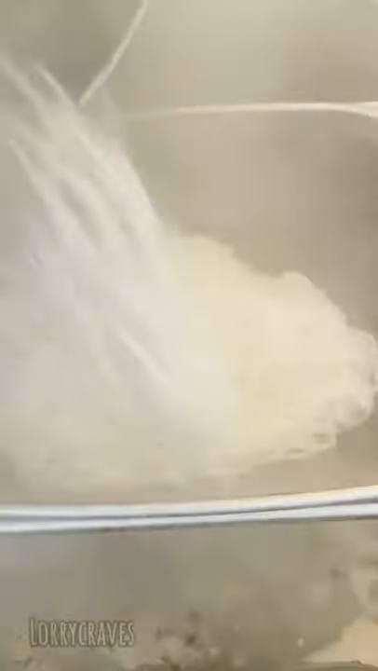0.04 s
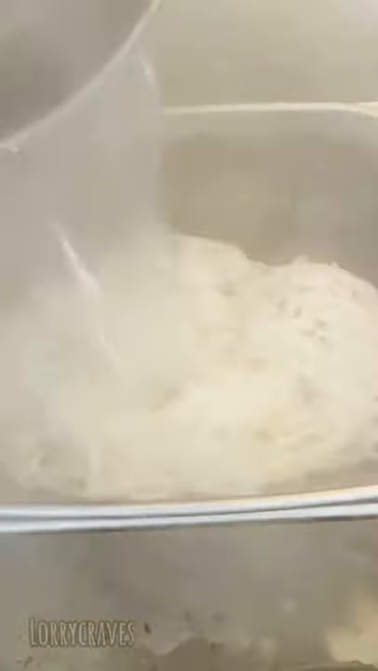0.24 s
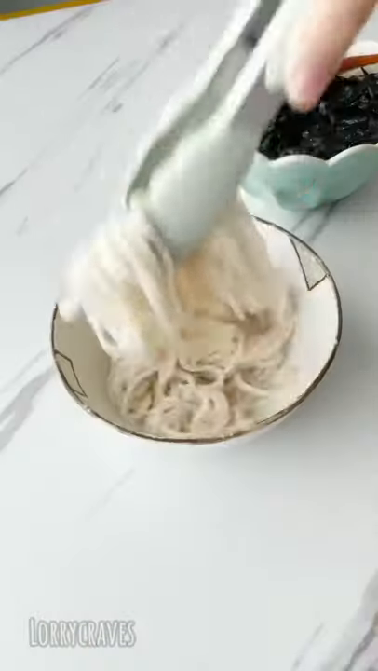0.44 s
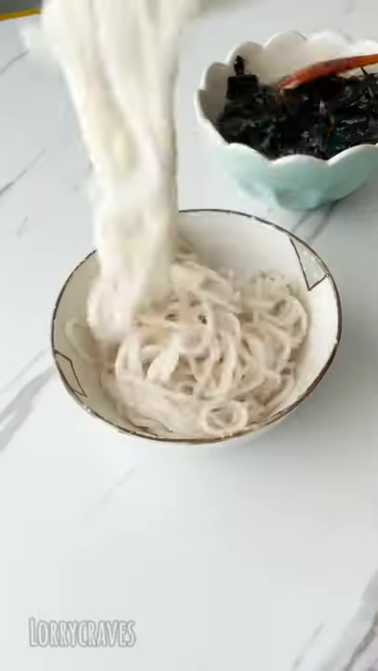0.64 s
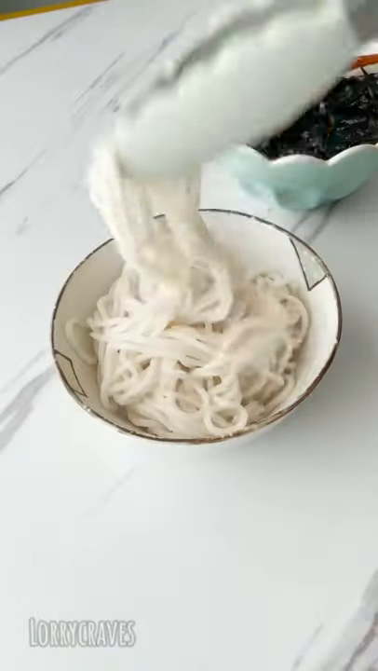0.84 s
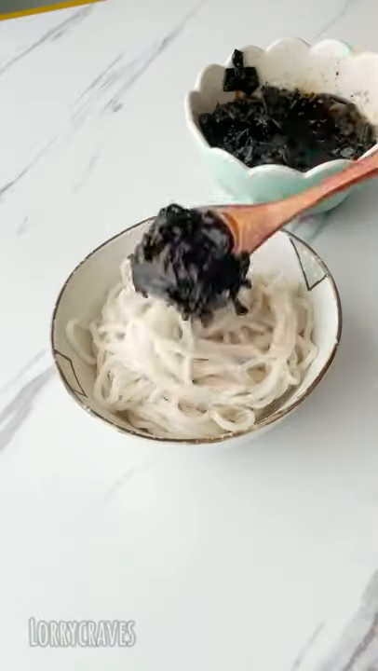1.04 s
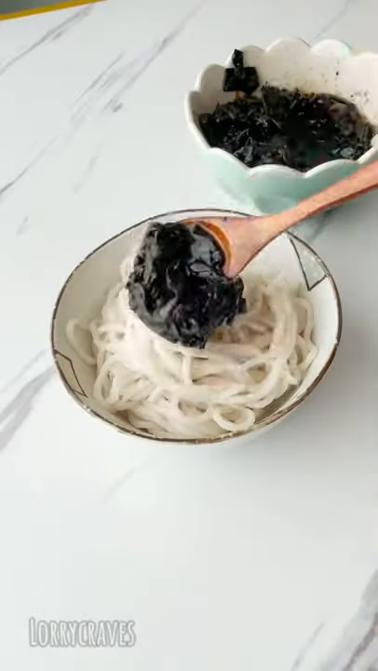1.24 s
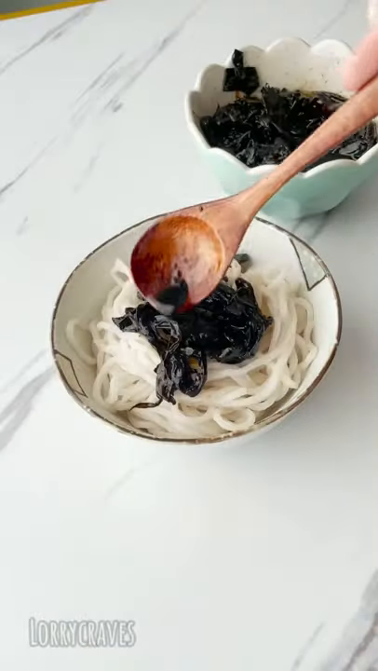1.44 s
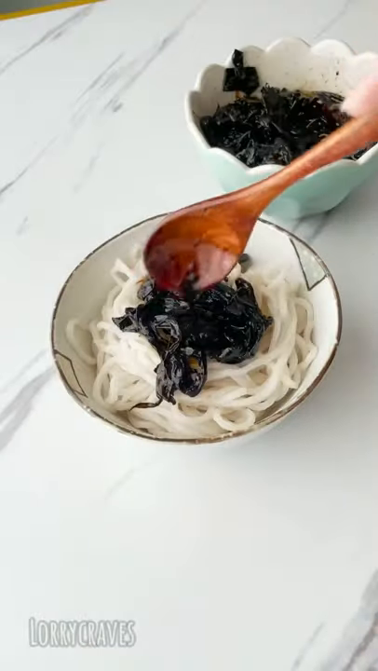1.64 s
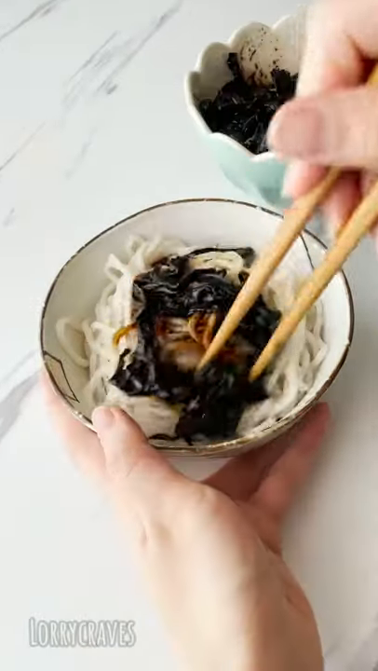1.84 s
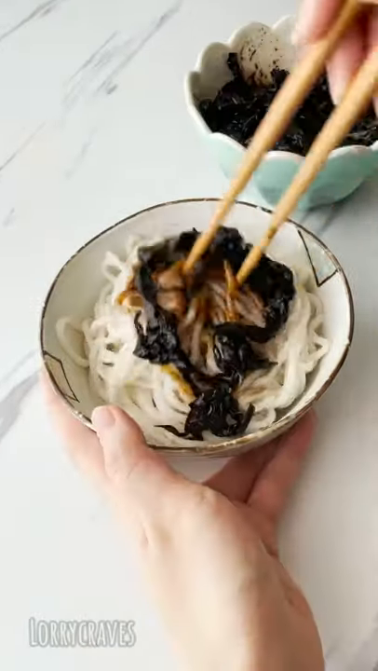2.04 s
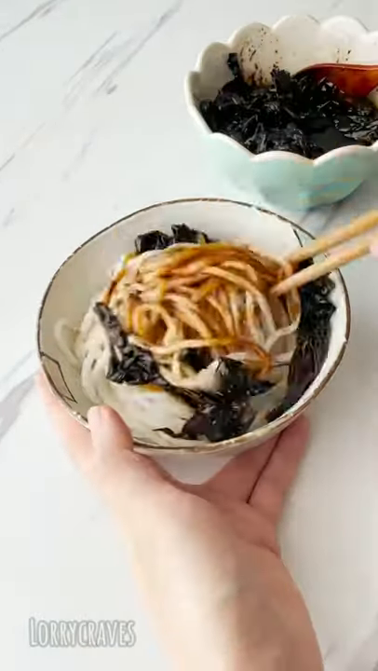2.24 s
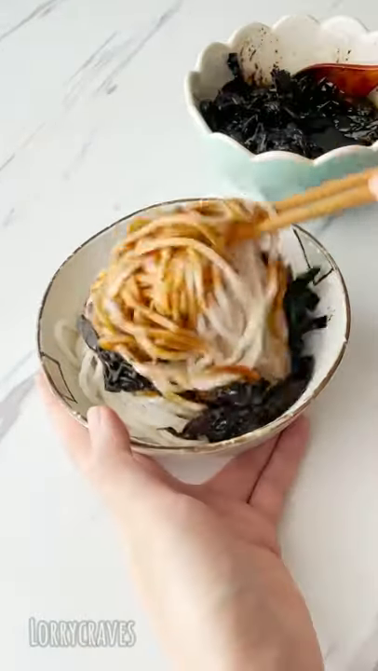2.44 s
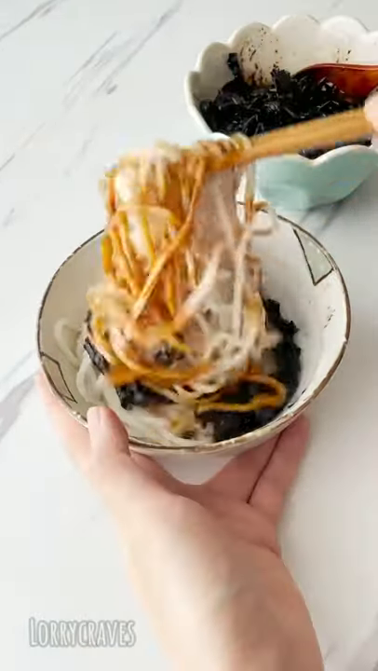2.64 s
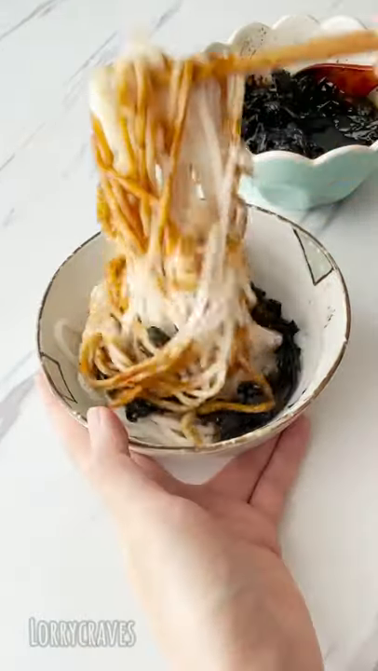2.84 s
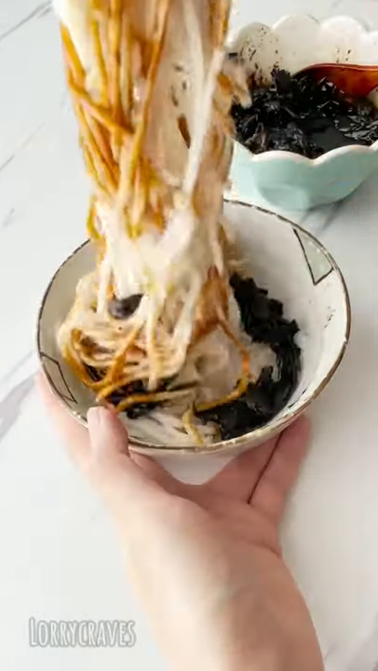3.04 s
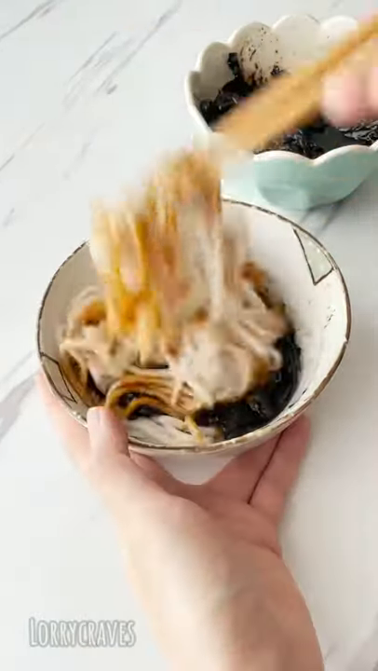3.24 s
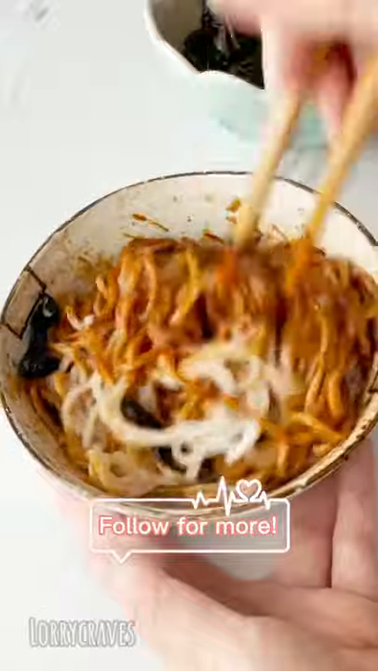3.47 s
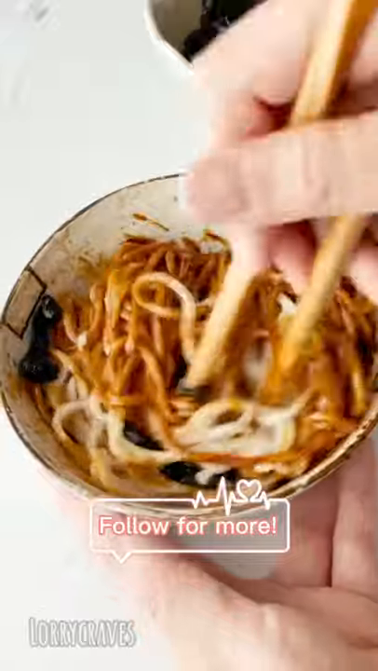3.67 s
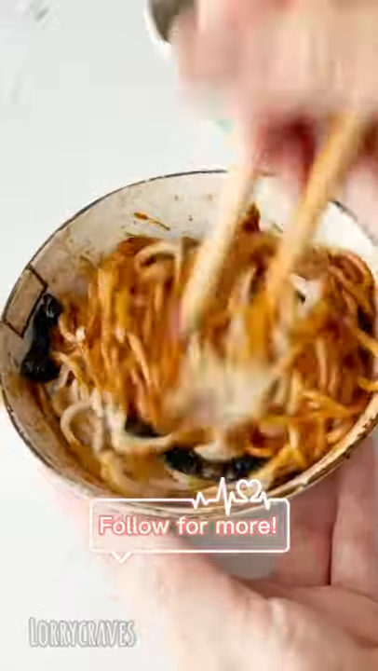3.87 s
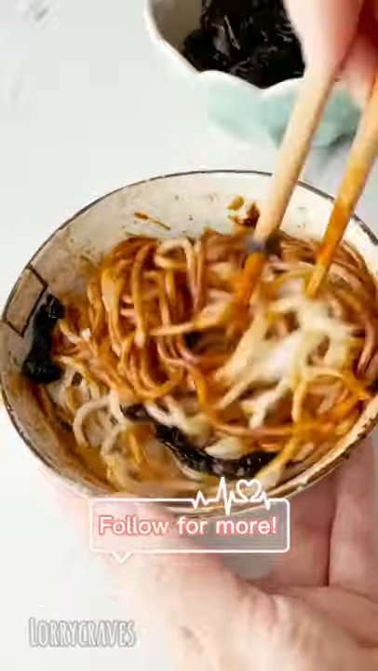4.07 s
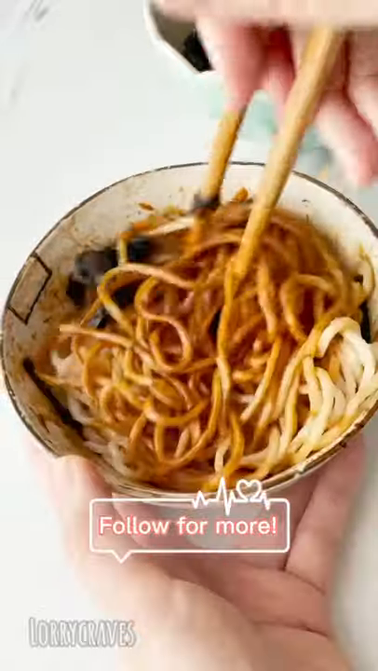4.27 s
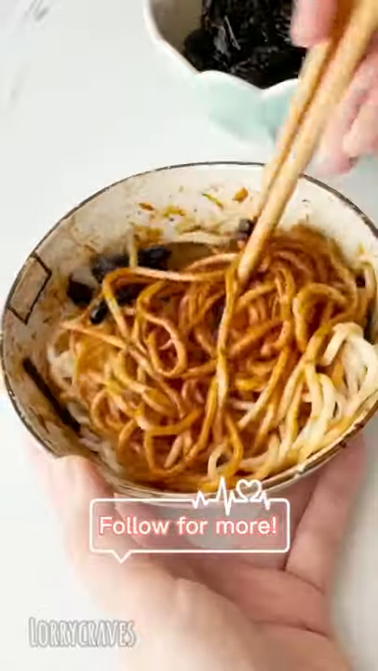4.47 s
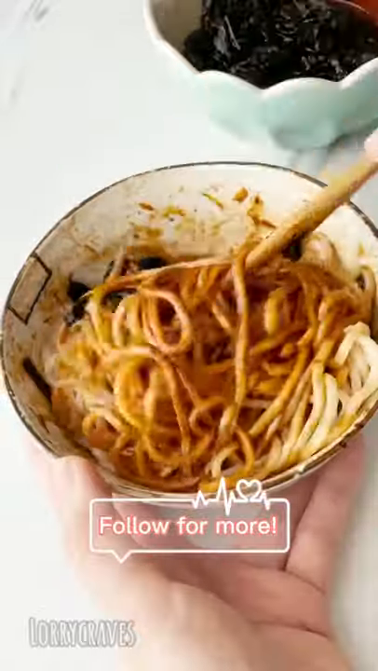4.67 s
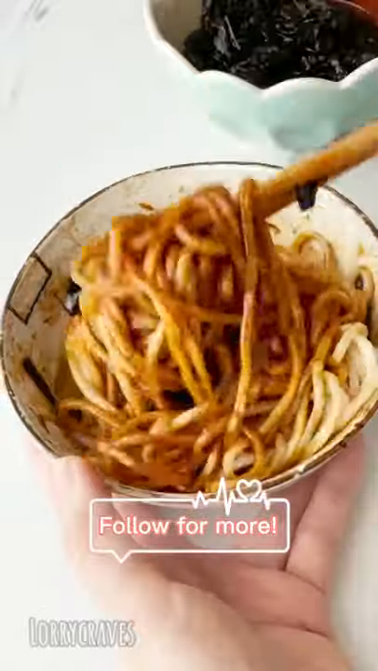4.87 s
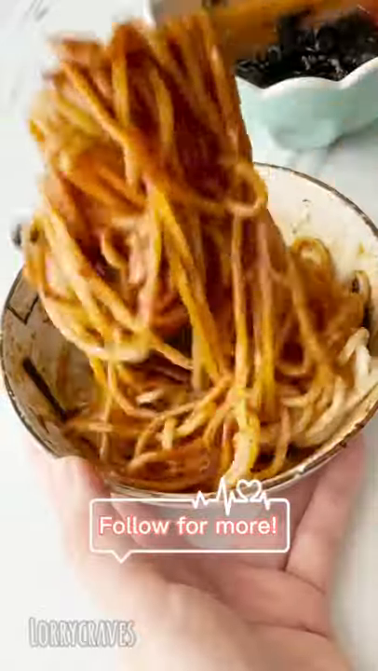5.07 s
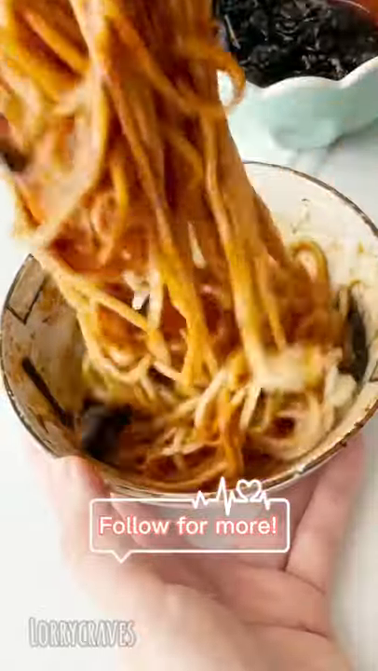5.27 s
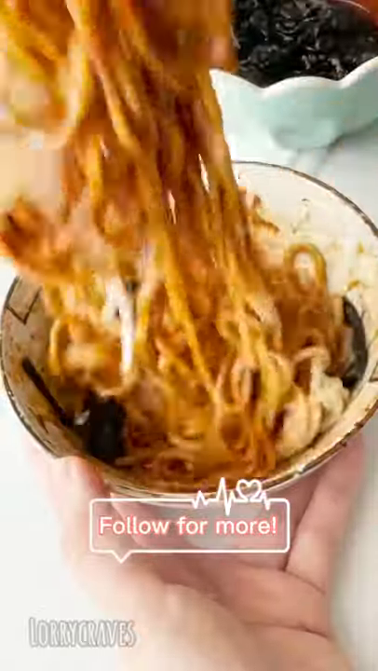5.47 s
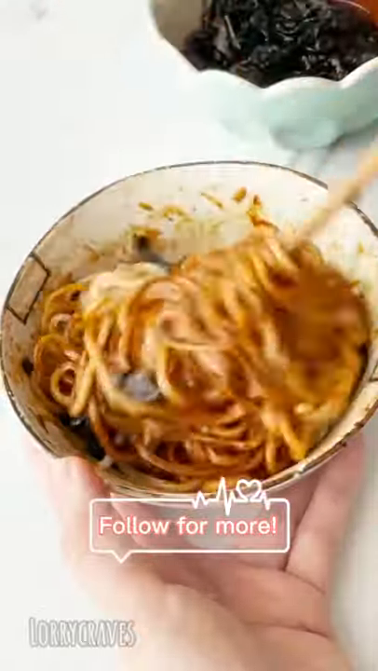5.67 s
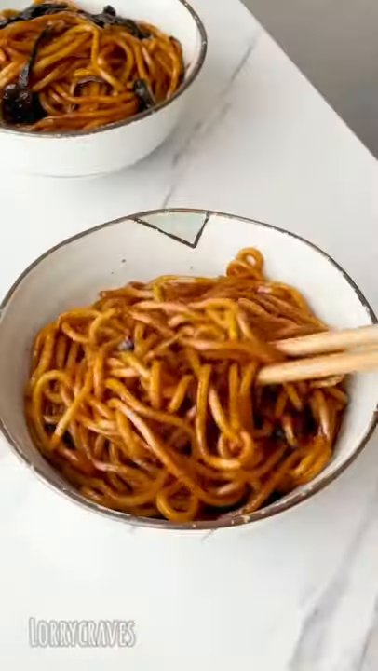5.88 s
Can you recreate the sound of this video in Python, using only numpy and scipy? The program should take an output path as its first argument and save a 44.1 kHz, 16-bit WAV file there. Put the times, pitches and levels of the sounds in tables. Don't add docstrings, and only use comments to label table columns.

```python
import sys
import numpy as np
from scipy import signal
from scipy.fft import rfft, irfft, next_fast_len
from scipy.io import wavfile
from scipy.ndimage import uniform_filter1d, map_coordinates

SR = 44100
rng = np.random.default_rng(int(sys.argv[2]) if len(sys.argv) > 2 else 0)


def unload_audio(sound):
    columns = np.transpose(np.atleast_2d(sound))
    steps = np.round(np.clip(columns, -1, 1) * 32767)
    wavfile.write(sys.argv[1], SR, steps.astype(np.int16))


def amplitude_ratio(level_db):
    exponent = np.asarray(level_db, float) / 20
    return 10 ** exponent


N = 260631


def unit(x):
    return x / np.sqrt(np.mean(x ** 2) + 1e-20)


def along(points, hz):
    f, v = np.transpose(points)
    return np.interp(np.log(hz + 1), np.log(f + 1), v)


def curves(points):
    s, *cols = np.transpose(points)
    lasts = s[-1] > 1
    return [np.interp(np.arange(N) / SR, s, c, left=-140, right=c[-1] if lasts else -140) for c in cols]


def wobble(rate):
    knots = rng.standard_normal(int(N * rate / SR) + 4)
    return map_coordinates(knots, [np.arange(N) * rate / SR])


def filtered(x, response):
    m = next_fast_len(N + 8192)
    return irfft(rfft(x, m) * response(np.fft.rfftfreq(m, 1 / SR)), m)[..., :N]


def coloured(x, spectrum):
    return unit(filtered(x, lambda hz: amplitude_ratio(along(spectrum, hz))))


def crackle(count, spread_db, life):
    draw = rng.random((count, 2))
    size_db = spread_db * np.minimum(-np.log(1 - draw[:, 1]), 4.5)
    kicks = np.bincount((draw[:, 0] * N).astype(int), amplitude_ratio(size_db), N)
    gate = signal.lfilter([1], [1, -np.exp(-1 / (life * SR))], kicks)
    return unit(gate * rng.standard_normal(N))


def add(track, s, sound):
    part = track[round(s * SR):][:len(sound)]
    part += sound[:len(part)]


def ring(hz, t60, attack):
    t = np.arange(int(min(t60, 1) * SR)) / SR
    return amplitude_ratio(-60 * t / t60) * (1 - np.exp(-t / attack)) * np.sin(2 * np.pi * hz * t)


def bells(rows):
    s, width, *cols = np.transpose(rows)
    shape = np.exp(-((np.arange(0, N, 32)[:, None] / SR - s) / width) ** 2)
    return [np.repeat(np.sqrt(shape @ amplitude_ratio(2 * db)), 32)[:N] for db in cols]


# (start t/s, rumble level/dB, boom
# level/dB, scrape body level/dB, grit level/dB)
STRETCHES = [(0.198, -63, -69.5, -89, -81), (0.549, -56.5, -60, -76.5, -84), (0.903, -67, -59, -96, -96.5),
             (1.627, -50, -51.5, -69.5, -75), (2.3, -50, -55, -88, -77), (3.929, -61, -83, -77.5, -73.5),
             (4.024, -51, -54.5, -76.5, -71.5), (4.58, -53, -63, -77.5, -71.5),
             (5.1, -53, -60.5, -76.5, -73), (5.733, -55.5, -62.5, -80, -77)]


def stretches():
    s, *cols = np.transpose(STRETCHES)
    now = np.searchsorted(s, np.arange(N) / SR) - 1
    return [uniform_filter1d(np.where(now < 0, -140, c[now]), size=200) for c in cols]


def astir(level_db, stir_db):
    shudder_s = 0.13
    blows = np.zeros(N)
    for s, db, *_ in KNOCKS:
        blows[round(s * SR)] = amplitude_ratio(db)
    shudder = signal.lfilter([1], [1, -np.exp(-1 / (shudder_s * SR))], blows)
    return np.sqrt(amplitude_ratio(2 * level_db) + amplitude_ratio(2 * stir_db) * shudder ** 2)


# (peak t/s, half width t/s, level/dB)
SWELLS = [(.26, 0.057, -58.5), (.72, 0.18, -55.5), (1.26, 0.073, -60.5), (1.45, 0.064, -62),
          (1.66, 0.042, -53.5), (1.85, 0.056, -39.5), (2.15, 0.029, -45), (2.37, 0.085, -42.5),
          (2.6, 0.2, -49.5), (2.91, 0.036, -52), (3.18, 0.061, -44.5), (3.51, 0.087, -39),
          (3.85, 0.046, -38), (4.12, 0.093, -38), (4.46, 0.071, -40), (4.82, 0.065, -38),
          (5.14, 0.083, -39), (5.46, .1, -42), (5.68, 0.049, -46), (5.85, 0.045, -51.5)]
# (f/Hz, level/dB per Hz)
RUMBLE = [(15, -36), (30, -9), (55, 2.5), (90, 1.5), (140, 0.5), (200, -7), (260, -45.5)]
# (f/Hz, level/dB per Hz)
BOXY = [(170, -11), (240, -4.5), (295, 4.5), (350, -9.5), (420, -10.5), (520, -26.5), (700, -25.5),
        (1100, -40), (2000, -75.5)]


def kitchen():
    hz = 61.5 + 3.1 * wobble(3.4)
    phase = 2 * np.pi * np.cumsum(hz) / SR + 0.43 * wobble(24)
    drone = np.sqrt(2) * bells(SWELLS)[0] * np.sin(phase)
    air = rng.standard_normal((2, N))
    wide = 0.66 * filtered(air[1], lambda f: f ** 2 / (f ** 2 + 190 ** 2))
    air = np.array([air[0] + wide, air[0] - wide])
    deep_db, boom_db = stretches()[:2]
    deep = astir(deep_db + 3.1 * wobble(7.2), stir_db=-35.0) * coloured(air, RUMBLE)
    boom = astir(boom_db + 2 * wobble(16), stir_db=-30.5) * coloured(air, BOXY)
    return drone + deep + boom


# (t/s, level/dB)
CUTS = [
    (0.898, -51.5),
    (1.231, -50.5),
    (4.027, -38),
    (5.73, -41),
]


def cuts():
    out = np.zeros(N)
    for s, db in CUTS:
        add(out, s, amplitude_ratio(db) * np.exp(-np.arange(300) / (0.0012 * SR)))
    return out


# (t/s, basin boom level/dB, splash level/dB)
POUR = [
    (0.0, -35, -36),
    (0.14, -35, -39),
    (0.192, -38, -32),
]
# (f/Hz, level/dB per Hz)
BOOM = [(20, -48), (40, -25.5), (65, 0), (95, -11.5), (140, 3), (190, -12), (255, -3), (400, -22.5),
        (700, -15), (1000, -22.5)]
# (f/Hz, level/dB per Hz)
SPLASH = [(290, -37), (500, -20), (1010, 0.5), (1980, 0), (3500, -3.5), (5670, -10), (8670, -8.5),
          (10300, -17), (13800, -10.5), (15700, -18.5), (16000, -35), (16700, -60.5)]


def pour():
    boom_db, splash_db = curves(POUR)
    boom = amplitude_ratio(boom_db) * coloured(rng.standard_normal(N), BOOM)
    drops = crackle(count=14000, spread_db=2.5, life=.002)
    return boom + amplitude_ratio(splash_db + 1.7 * wobble(29)) * coloured(drops, SPLASH)


# (start t/s, length t/s, f/Hz, level/dB, roughness/rad)
SQUEAKS = [(1.636, 0.047, 2720, -62, .5), (1.68, 0.092, 2590, -71, .6), (1.83, .08, 2600, -78, .7),
           (3.345, .055, 3950, -53, 1.6), (3.34, 0.067, 5600, -60, 2.5), (3.095, 0.037, 1650, -64, 1.2),
           (1.99, 0.074, 960, -62, 1.3), (1.786, 0.053, 2700, -68, .4), (3.16, 0.16, 1970, -62, 2.5)]


def squeaks():
    out, t = np.zeros(N), np.arange(N) / SR
    flutter_db, drift_hz, jitter = 2.6 * wobble(60), 45 * wobble(25), wobble(220)
    for s, length, hz, db, rough in SQUEAKS:
        swell = np.abs(np.sin(np.pi * np.clip((t - s) / length, 0, 1))) ** .6
        phase = 2 * np.pi * np.cumsum(hz + drift_hz) / SR + rough * jitter
        out = out + amplitude_ratio(db + flutter_db) * swell * np.sin(phase)
    return out


# (t/s, level/dB, second tone level/dB, third tone level/dB)
CLINKS = [
    (5.213, -48.5, 4.5, -7.5),
    (5.311, -52, -35, -28),
    (5.523, -57.5, -15, -20),
    (5.63, -62, -18, -19),
]
# (f/Hz, level/dB, 60 dB fade t/s)
BOWL = [(1103, -4.5, 0.17), (2560, -0.5, 0.066), (4460, 1, 0.13)]


def clinks():
    out = np.zeros(N)
    for s, db, *upper_db in CLINKS:
        for (hz, level, t60), touch_db in zip(BOWL, [0] + upper_db):
            add(out, s, amplitude_ratio(db + level + touch_db) * ring(hz, t60, 0.0013))
    return out


# (t/s, level/dB, f/Hz)
POPS = [(0.242, -44, 7000), (0.2523, -44, 2800), (0.2942, -44, 6140), (0.3288, -38.5, 3180),
        (1.833, -32, 7240), (1.645, -41, 3700), (2.836, -42, 7300), (3.155, -42, 5530), (3.0792, -35, 4600),
        (3.851, -44, 2500), (3.876, -41.5, 6000), (4.035, -35.5, 2240), (4.045, -36.5, 2500),
        (4.069, -33, 2300), (4.451, -30.5, 5700), (4.565, -35.5, 5600), (4.686, -40, 5700),
        (5.797, -47, 4181), (5.032, -29, 15500), (.262, -58, 2600), (.31, -51, 2700), (.322, -51, 3000),
        (.345, -56, 2500), (.37, -53, 2900), (.395, -57, 2400), (.492, -54, 3525), (3.047, -42, 3001),
        (3.598, -40, 6500), (2.335, -40, 5100), (2.731, -36, 6500), (2.2042, -28.5, 5770),
        (2.3347, -20.5, 7300), (3.0389, -25, 3700), (3.0802, -30.5, 3620), (3.582, -33, 5830),
        (3.8283, -31, 7740), (4.036, -25, 5700), (4.0681, -24.5, 3280), (4.1667, -35.5, 2200),
        (4.1742, -29, 7560), (4.3096, -34.5, 2660), (4.367, -20, 7700), (4.4127, -13.5, 7480),
        (4.196, -41.5, 2397), (4.632, -29.5, 7670), (4.7672, -32, 6400), (4.8184, -33, 6353),
        (4.841, -33, 5090), (5.528, -36, 7450)]
# (t/s, level/dB)
TICKS = [(0.701, -42.5), (2.089, -44.5), (2.096, -37), (2.118, -52.5), (2.127, -51), (3.294, -53),
         (2.177, -43), (2.731, -43), (3.038, -38), (3.078, -36), (3.608, -30.5), (4.318, -30.5),
         (4.39, -34), (4.488, -39.5), (5.209, -50.5)]
# (t/s, level/dB, f/Hz, 60 dB fade t/s)
SLAPS = [(3.0244, -40.5, 3760, 0.0083), (3.040, -34.5, 740, 0.025), (3.14, -33.5, 1460, 0.013),
         (4.2516, -10, 2440, 0.0098), (4.2534, -18, 1300, .02), (3.774, -39, 660, .015),
         (3.4582, -18, 430, 0.017), (3.6087, -29.5, 1850, 0.007), (3.609, -33.5, 2600, .006),
         (3.610, -26, 566, 0.0091), (3.773, -35, 544, 0.017), (4.2, -32, 2250, .007),
         (4.2437, -23.5, 2130, 0.0086), (4.2516, -3, 1950, .009), (4.2512, -16, 6470, 0.0059),
         (4.2516, -9, 2780, 0.0032), (4.2540, -13, 605, 0.019), (4.2538, -11, 410, .02),
         (4.2838, -13, 440, .02), (5.214, -31, 398, 0.029)]


def pops():
    out, t = np.zeros(N), np.arange(400) / SR
    for s, db, hz in POPS:
        add(out, s + .0007, amplitude_ratio(db + 3) * ring(hz, 8 / hz + .0015, .0003))
    soften = signal.butter(1, 3600, fs=SR)
    for s, db in TICKS:
        burst = amplitude_ratio(-60 * t / 0.0021) * rng.standard_normal(len(t))
        add(out, s + 0.00057, amplitude_ratio(db + 7.0) * signal.lfilter(*soften, burst))
    for s, db, hz, t60 in SLAPS:
        add(out, s, amplitude_ratio(db) * ring(hz, t60, 0.19 / hz))
    return out


# (t/s, level/dB, share of full ring, contact t/s, lowest tone level/dB)
KNOCKS = [(1.627, -18, 0.14, 0.0011, -10.5), (2.124, -34.5, 0.31, 0.0017, 2.5),
          (3.039, -25.5, 0.3, 0.00089, -12), (3.083, -24, 0.52, 0.0044, -4.5),
          (3.456, -15, 0.52, 0.00045, -8.5), (3.609, -20.5, 0.52, 0.00071, -22),
          (3.772, -28.5, 0.48, 0.0023, -3.5), (4.024, -32.5, 0.31, 0.0018, -5.5),
          (4.2523, -16, 1, 0.0014, -20), (4.281, -10.5, 1.1, 0.0026, -6), (4.452, -33, 0.98, 0.0024, -22),
          (5.215, -28, 0.35, 0.0057, 6.5)]
# (f/Hz, level/dB, 60 dB fade t/s)
TABLE = [(273, -1, 0.55), (333.8, -3, 0.18), (429, -9, 0.14), (490, -0.5, 0.019), (597.5, 6, 0.038),
         (764, -4, 0.052), (952, -22.5, 0.12), (1300, -23, 0.052)]


def knocks():
    grip_s = 0.19
    out = np.zeros(N)
    for s, db, share, contact, lowest_db in KNOCKS:
        for k, (hz, level, t60) in enumerate(TABLE):
            soft = 1 / (1 + (hz * contact / 2) ** 2)
            tone_db = db + level + rng.normal(0, 2.8) - 6.0 + lowest_db * (k == 0)
            detuned = hz * (1 + rng.normal(0, 0.017) * (k > 0))
            tone = ring(detuned, t60 * np.clip(share, .1, 2), 0.0019)
            grip = np.exp(-(np.arange(len(tone)) / (grip_s * SR)) ** 4)
            add(out, s + 0.0016, amplitude_ratio(tone_db) * soft * tone * grip)
    return out


# (peak t/s, fall t/s, body level/dB, grit level/dB, hollow f/Hz)
JABS = [(1.631, 0.073, -43, -57, 910), (2.12, 0.018, -50.5, -57.5, 494), (2.735, 0.0064, -53.5, -67, 970),
        (3.045, 0.083, -56.5, -57.5, 700), (3.083, 0.0082, -41, -51.5, 1300),
        (4.033, 0.097, -48, -54.5, 2300), (4.256, 0.028, -23, -36.5, 800), (4.468, 0.021, -41.5, -53, 495),
        (5.226, 0.025, -52, -65, 399)]
# (peak t/s, fall
# t/s, body level/dB, grit level/dB, hollow f/Hz)
SWEEPS = [(1.68, 0.036, -47.5, -82.5, 810), (2.02, 0.034, -54, -109, 760), (1.78, 0.062, -61.5, -85, 1330),
          (3.375, 0.02, -61, -70, 3900), (4.54, 0.071, -45.5, -73, 380), (3.19, .09, -46.5, -88.5, 300),
          (3.67, .04, -53, -79, 570), (5.25, 0.034, -52, -90, 420), (0.289, 0.11, -64, -88, 2950),
          (2.329, 0.0091, -51.5, -67, 464), (3.17, 0.1, -60, -63.5, 2800), (3.575, .02, -59.5, -77, 2200),
          (3.334, 0.04, -42.5, -58, 560), (3.374, 0.034, -30, -40.5, 673), (3.636, 0.025, -40, -52.5, 630),
          (4.364, 0.1, -68, -52, 713), (5.139, 0.035, -49.5, -90, 450), (5.58, 0.054, -69, -66.5, 700)]
# (f/Hz, level/dB per Hz)
BODY = [(250, -42), (380, 3.5), (617, 3.5), (940, 1), (1500, -23), (2200, -39.5)]
# (f/Hz, level/dB per Hz)
GRIT = [(710, -25), (1200, -5.5), (3110, -11.5), (3500, -15.5), (3910, -15), (5490, -20), (7000, -27.5),
        (9100, -55.5), (15400, -120)]


def scrape():
    def slips():
        return crackle(count=12000, spread_db=3.0, life=0.0036)

    held_body_db, held_grit_db = stretches()[2:]
    shared = slips()
    rough = coloured(shared, BODY)
    body = astir(held_body_db, stir_db=-51.0) * rough
    grit_power = astir(held_grit_db, stir_db=-50.5) ** 2
    strokes = [(.004, *row) for row in JABS] + [(.75 * row[1], *row) for row in SWEEPS]
    for rise, s, fall, body_db, grit_db, hz in strokes:
        lag = np.arange(N) / SR - s
        push = np.exp(-np.where(lag < 0, (lag / rise) ** 2, 2 * lag / fall))
        peak = signal.iirpeak(hz, 1.6, SR)
        hollow = unit(signal.lfilter(*peak, signal.lfilter(*peak, shared)))
        body = body + amplitude_ratio(body_db) * np.sqrt(push) * (0.4 * hollow + 0.13 * rough)
        grit_power = grit_power + amplitude_ratio(2 * grit_db) * push
    return body + np.sqrt(grit_power) * coloured(shared + 10.0 * slips(), GRIT)


# (t/s, crackle level/dB)
TOSS = [(.196, -63), (.45, -60.5), (.75, -78), (.9, -97), (.904, -118), (1.622, -118), (1.627, -63),
        (2.0, -56.5), (2.29, -51.5), (2.44, -56), (2.59, -66.5), (3.2, -60), (3.95, -65.5), (4.27, -50),
        (4.8, -52.5), (5.05, -59), (5.5, -65.5), (5.91, -65.5)]
# (peak t/s, half width t/s, high level/dB, low level/dB)
TEARS = [(3.36, .02, -50, -78), (3.57, 0.082, -53, -63.5), (3.86, 0.05, -52.5, -60),
         (4.045, 0.0095, -49, -61), (4.25, 0.0048, -39.5, -58.5), (4.265, .02, -62, -46),
         (.71, 0.024, -75, -69.5), (5.58, 0.04, -49, -59.5)]
# (t/s, high level/dB, low level/dB)
THICK = [(0.1793, -16, -49.5), (0.244, -43.5, -53.5), (0.329, -39.5, -52.5), (0.6232, -47, -55),
         (1.9046, -38.5, -49.5), (2.173, -37.5, -52), (2.1949, -32, -46.5), (2.2596, -33, -42),
         (2.3209, -33, -47), (2.3904, -36, -50), (2.4189, -34, -52), (2.6192, -43, -55),
         (2.731, -36.5, -46.5), (3.354, -33, -51), (3.568, -33.5, -49), (3.7464, -37.5, -51.5),
         (3.826, -37.5, -49), (4.0392, -28, -35.5), (4.066, -34.5, -34), (4.1561, -34.5, -43),
         (4.2504, -21.5, -26), (4.31, -33.5, -38.5), (4.3408, -35, -39), (4.391, -32, -44),
         (4.665, -34, -42), (4.818, -44, -49), (4.8397, -29, -41)]
# (t/s, level/dB)
THIN = [(0.2218, -31.5), (0.428, -39.5), (0.5128, -47), (0.53, -44), (0.698, -47), (0.738, -46.5),
        (1.976, -42), (2.0216, -38), (2.516, -39), (3.2282, -35), (3.37, -28.5), (3.4932, -36.5),
        (4.5454, -42), (4.5908, -43), (4.6303, -46), (4.732, -44), (4.907, -31.5), (5.0323, -39),
        (5.4125, -41.5), (5.4398, -32), (5.5453, -35), (5.823, -47)]
# (t/s, level/dB, low over high level/dB)
FINE = [(0.2944, -53, -12), (0.4924, -49, -11.5), (0.6494, -49.5, -21), (1.6796, -43.5, -16),
        (1.706, -50, -20), (1.7714, -50, -18), (1.7928, -44, -7), (1.8741, -45, -9), (2.002, -45, -20),
        (2.0418, -54, -19), (2.2298, -46, -16), (2.2767, -40, -16), (2.3114, -49, -21), (2.3471, -38, -11),
        (2.4024, -44, -12), (2.4678, -48, -24), (2.5044, -46, -25), (2.5436, -54, -16), (2.632, -42, -15.5),
        (2.6626, -51, -16), (2.7148, -43, -17), (2.7484, -47, -16), (2.7803, -41, -17.5),
        (2.7974, -46, -14), (2.819, -42, -17), (2.8454, -51.5, -16), (2.9333, -48, -24),
        (3.0619, -41.5, -22), (3.2154, -43, -16), (3.5444, -52, -18), (3.5565, -40, -21),
        (3.8053, -57, -26), (3.888, -42, -13.5), (4.4403, -51, -16), (4.4854, -44.5, -12),
        (4.5644, -46, -16), (4.6145, -43, -24), (4.6854, -52, -14), (4.7944, -41, -16), (4.857, -47, -14),
        (4.8725, -44, -9.5), (4.9612, -43, -14), (5.0115, -46, -22), (5.2021, -43, -19),
        (5.307, -49, -15.5), (5.3535, -50, -28), (5.4553, -46, -16), (5.6535, -43, -16), (5.685, -50, -16),
        (5.7962, -57, -14)]
# (f/Hz, level/dB per Hz)
WET_LOW = [(2000, -37), (3500, -11), (5000, -5), (6400, 0.5), (8300, 2.5), (10000, -3), (11500, -17),
           (13000, -37.5)]
# (f/Hz, level/dB per Hz)
WET_HIGH = [(8000, -32), (9500, -9), (11600, -0.5), (14200, 2.5), (15700, -7.5), (16000, -22), (16700, -41)]


def squish():
    toss_db, = curves(TOSS)
    torn_high, torn_low = bells(TEARS)
    grains = .75 * crackle(count=1800, spread_db=2.8, life=.0007) + .4 * rng.standard_normal(N)
    bed = amplitude_ratio(2.5 * wobble(35)) * grains
    low_db = -70 + 1.7 * (toss_db + 58.5)
    low = np.hypot(amplitude_ratio(low_db), torn_low) * bed
    high = amplitude_ratio(-5.0) * np.hypot(amplitude_ratio(toss_db), torn_high) * bed

    t = np.arange(900) / SR
    thin = [(s, db, db - 24.5) for s, db in THIN]
    fine = [(s, db, db + rel_db) for s, db, rel_db in FINE]
    for s, high_db, under_db in list(THICK) + thin + fine:
        fade = amplitude_ratio(-60 * t / 0.004) + 0.06 * amplitude_ratio(-60 * t / 0.035)
        burst = fade * rng.standard_normal(len(t))
        burst = burst / np.linalg.norm(burst) * 6
        add(high, s + 0.0003, amplitude_ratio(high_db - 3.5) * burst)
        add(low, s + .0008, amplitude_ratio(under_db + 4.0) * burst)

    white = rng.standard_normal(N)

    def tint(x, spectrum):
        def shape(hz):
            return amplitude_ratio(along(spectrum, hz))
        return filtered(x, shape) / np.std(filtered(white, shape))

    return tint(low, WET_LOW) + tint(high, WET_HIGH)


# (f/Hz, 60 dB fade t/s)
WALLS = [(200, 0.28), (1000, 0.022), (4000, 0.035), (12000, 0.028)]


def walls(x):
    hz, t, z = signal.stft(rng.standard_normal((2, SR // 2)), SR, nperseg=256)
    fade = amplitude_ratio(-60 * t / along(WALLS, hz)[:, None])
    tail = signal.istft(z * fade, SR, nperseg=256)[1]
    tail = tail / np.linalg.norm(tail[0])
    late = np.pad(x, (150, 0))[None]
    return signal.fftconvolve(late, tail, axes=1)[:, :N]


def scene():
    blows = knocks() + pops()
    rest = clinks() + scrape() + squish() + squeaks()
    background = kitchen() + cuts() + pour()
    return background + blows + rest + amplitude_ratio(-20) * walls(blows) + amplitude_ratio(-6.0) * walls(rest)


def thin_treble(pair):
    both = np.array([pair[0] + pair[1], pair[0] - pair[1]])
    hz, s, z = signal.stft(both, SR, nperseg=1024)
    # (0 sum or 1 difference, from Hz, to Hz, power needed over the usual)
    bands = [(0, 8500, 9300, 1.0), (0, 9300, 11000, 1.9), (0, 11000, 17000, 0), (1, 14300, 17000, 1)]
    for k, low, high, margin in bands:
        band = (hz > low) & (hz < high)
        power = np.mean(np.abs(z[k, band]) ** 2, axis=0)
        usual = signal.medfilt(power, kernel_size=19)
        z[k, band] *= power > margin * usual + 4e-11
    z[0, (hz > 9100) & (hz < 11000)] *= s > .15
    mid, side = signal.istft(z, SR, nperseg=1024)[1][:, :N]
    return np.array([mid + side, mid - side]) / 2


def band_limit(x):
    return signal.sosfilt(signal.butter(12, 17010, fs=SR, output="sos"), x)


# (f/Hz, level/dB per Hz)
HISS = [(300, -28), (1000, 6.5), (11000, -11.5), (12000, -36.5)]
# (f/Hz, lead/rad)
PORTS = [(30, .04), (80, .06), (150, 0.15), (300, 0.15), (600, 0.66), (1200, 1.3), (2000, .05),
         (2900, 0.49), (3600, 1.5), (5700, 0.07), (8000, 2.08), (9200, 2.44), (10800, 3.5), (12000, 4.2),
         (15500, 6.0)]


def record(dry):
    noise = rng.standard_normal(N) + .5 * rng.standard_normal((2, N))
    hiss = amplitude_ratio(-105) * coloured(noise, HISS)

    def ports(hz):
        top = amplitude_ratio(along([(15800, 2), (16100, -23.0), (16800, -42.5)], hz))
        return top * np.exp(1j * np.outer([.5, -.5], along(PORTS, hz)))

    mix = thin_treble(filtered(dry + hiss, ports))
    return band_limit(mix)


dry = scene()
out = record(dry)
unload_audio(out)
```